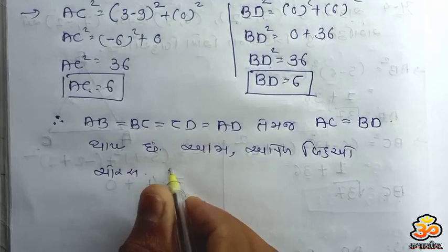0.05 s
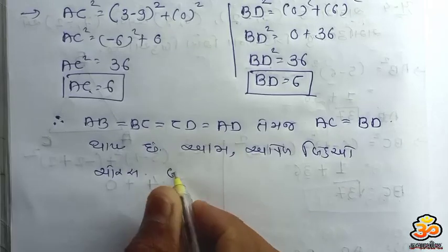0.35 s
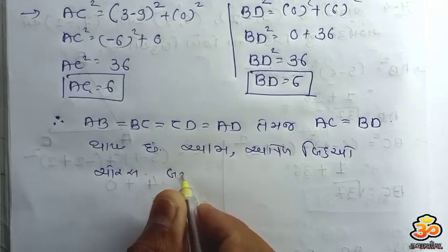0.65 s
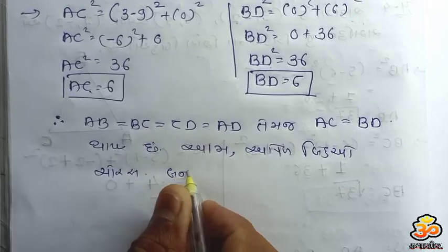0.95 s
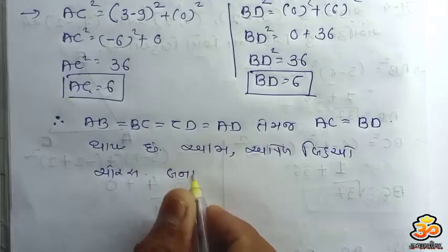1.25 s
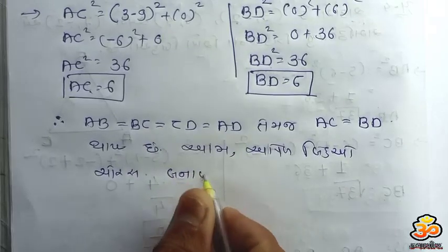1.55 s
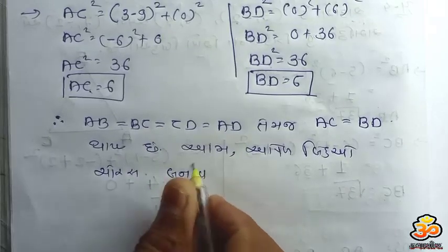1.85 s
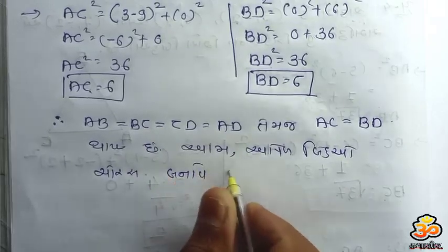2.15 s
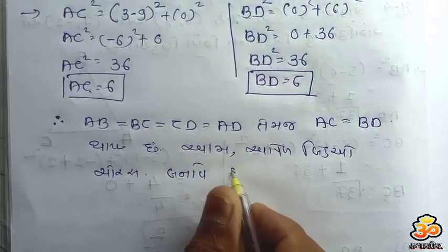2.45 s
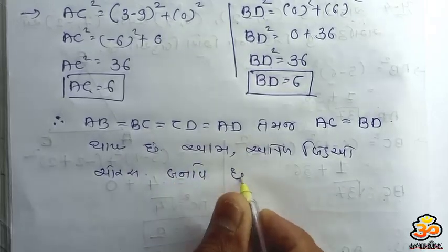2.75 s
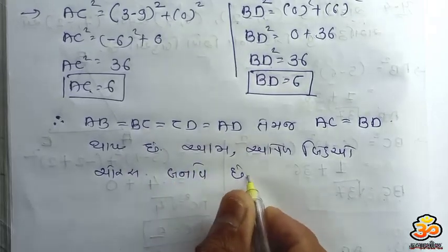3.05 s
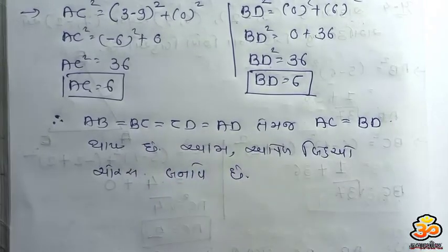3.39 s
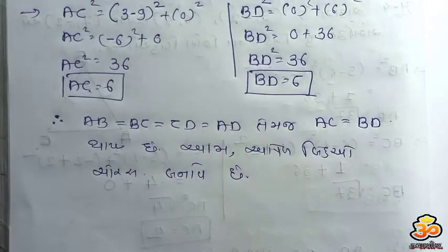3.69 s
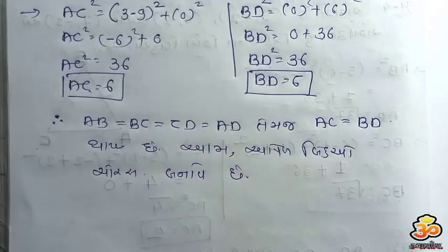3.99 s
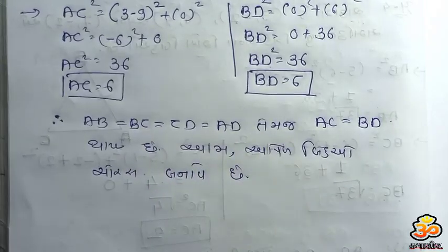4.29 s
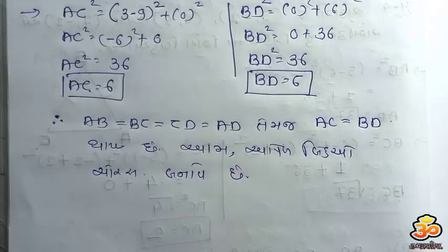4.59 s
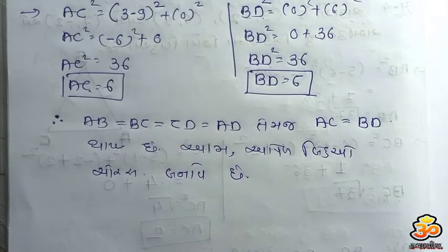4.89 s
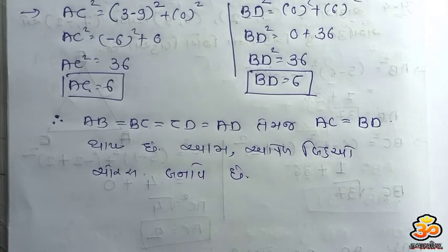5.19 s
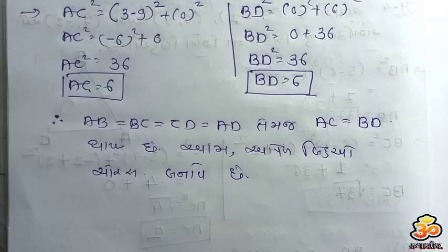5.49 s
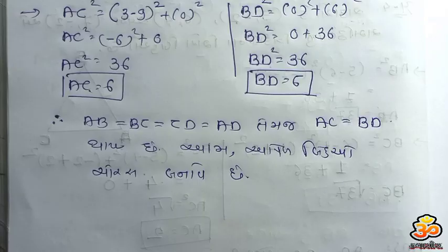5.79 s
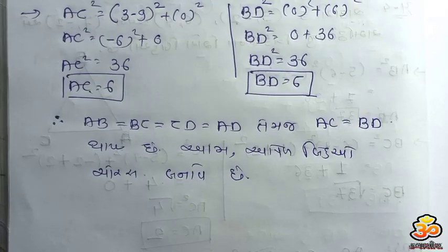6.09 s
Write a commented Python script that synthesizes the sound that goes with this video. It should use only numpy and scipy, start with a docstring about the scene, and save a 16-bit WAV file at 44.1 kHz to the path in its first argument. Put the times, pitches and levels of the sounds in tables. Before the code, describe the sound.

Crickets trill throughout in a quiet room, high and rapidly pulsing, with a fainter, lower cricket chirping slowly behind them. A ballpoint pen rolls faintly over paper near the microphone, clicking sharply a couple of times, and stops about halfway. It is put aside with a few light clicks and soft knocks on the desk. Then only the insects and a low room hum remain.

```python
"""Night in a quiet room. From the start two crickets scrape their wings, about ten strokes a second,
drifting out of step; a lower cricket chirps, an insect's wings buzz, a distant chorus hangs over the hum.
A ballpoint rolls and clicks across paper, finishing a word, and lifts just before three seconds.
It is put aside with a few clicks and soft knocks on the desk.
From about four and a half seconds on, only the insects and the room remain."""
import sys
import numpy as np
from scipy import signal
from scipy.fft import rfft, irfft, next_fast_len
from scipy.io import wavfile

SR = 44100
rng = np.random.default_rng(int(sys.argv[2]) if len(sys.argv) > 2 else 0)


def master_out(mix):
    """Clip the mix to full scale and print it as 16-bit PCM to the path in sys.argv[1]."""
    frames = np.transpose(np.atleast_2d(mix))
    ceiling = np.clip(frames, -1, 1)
    pcm = np.round(ceiling * 32767).astype(np.int16)
    wavfile.write(sys.argv[1], SR, pcm)


N = 270701


def near_cricket():
    """The lead voice: a bright trill with three early reflections off the walls."""
    # runs of even strokes, each a skip or change of pace: (start [s], pace [strokes/s], level [dB])
    runs = [(-0.031, 10.2, -38.7), (0.3504, 10.02, -38.8), (1.2487, 10.137, -38.7), (2.433, 10.137, -38),
            (3.7251, 9.951, -38.3), (4.4276, 10.17, -37.6)]
    # course of one stroke: (time [s], pitch [Hz], relative level [dB], pitch scatter [Hz])
    stroke = [(0, 8060, -19, 300), (.002, 7830, -12, 280), (.007, 7620, -9.5, 180), (.013, 7405, -6.5, 150),
              (.02, 7633, -6.5, 160), (0.026, 7500, -2, 70), (0.036, 7542, -1, 45.7),
              (.039, 7490, -12.5, 90.5), (0.043, 7030, -9, 120), (.048, 6820, -26.5, 200)]
    # first reflections: (delay [s], gain [dB])
    wall_echoes = [(0.0107, -7), (0.022, -18.5), (0.0338, -16.5)]
    direct = wing_scrape(wing_strokes(runs), stroke, wing_hz=7160, wing_width_hz=1060, scatter_rate=870,
                         flutter_hz=152, flutter_depth=0.31, octave_db=-43, rasp_db=-32.5, sheen_db=-50)
    echoed = direct.copy()
    for delay, db in wall_echoes:
        add(echoed, delay, from_db(db) * direct)
    return from_db(0.5) * reverb(echoed, t60=0.46, wet_db=-7.5)


def far_cricket():
    """A softer, slightly lower trill that arrives largely by way of the walls."""
    # runs of even strokes: (start [s], pace [strokes/s], level [dB])
    runs = [(0.0532, 10.02, -52), (0.6519, 10.4, -52.5), (1.4614, 10.34, -53), (2.139, 10, -52.5),
            (4.4505, 9.906, -51.5), (5.46, 9.735, -52)]
    # course of one stroke: (time [s], pitch [Hz], relative level [dB], pitch scatter [Hz])
    stroke = [(-.014, 7100, -14, 302), (0, 6950, -3.5, 290), (0.01, 6720, -1.5, 190),
              (.019, 6440, -2.5, 140), (0.023, 6330, -1.5, 85), (.030, 6100, -17, 80)]
    direct = wing_scrape(wing_strokes(runs), stroke, wing_hz=6670, wing_width_hz=2000, scatter_rate=720,
                         flutter_hz=213, flutter_depth=0.47, octave_db=-36, rasp_db=-36.5, sheen_db=-30)
    return from_db(2.5) * reverb(direct, t60=0.4, wet_db=0.5)


def low_cricket():
    """Slow, almost pure two-pulse chirps from a narrowly tuned wing."""
    # chirps: (time [s], level [dB])
    chirps = [(.149, -58), (.47, -59), (.853, -58.5), (1.239, -57.5), (1.587, -58), (2.017, -57.5),
              (2.353, -58), (2.762, -56.5), (3.27, -57.5), (3.584, -58.5), (3.927, -56.5), (4.338, -56.5),
              (4.709, -57.5), (5.047, -56), (5.623, -55.5), (5.926, -56)]
    # course of one chirp: (time [s], pitch [Hz], relative level [dB], pitch scatter [Hz])
    chirp = [(-.025, 3760, -21, 25), (0, 3804, -18.5, 25), (.02, 3808, -6.5, 16), (0.049, 3817, -1, 10.7),
             (0.075, 3818, -6.5, 11), (.086, 3810, -24, 25), (.1, 3812, -21, 22), (.116, 3814, -7.5, 20),
             (.138, 3805, -19, 30)]
    direct = wing_scrape(chirps, chirp, wing_hz=3770, wing_width_hz=280, scatter_rate=160,
                         flutter_hz=45.22, flutter_depth=0.062, octave_db=-55, rasp_db=-51, sheen_db=-58)
    return from_db(-0.04) * reverb(direct, t60=0.37, wet_db=-14)


def wing_strokes(runs, jitter_s=.0005, spread_db=0.25):
    """Strokes keep the pace of their run until the next takes over; gives (time [s], level [dB])."""
    ends = [start - .5 / pace for start, pace, _ in runs[1:]] + [N / SR]
    even = np.array([(s, db) for (start, pace, db), end in zip(runs, ends)
                     for s in np.arange(start, end, 1 / pace)])
    return even + rng.standard_normal(even.shape) * [jitter_s, spread_db]


def wing_scrape(strokes, shape, wing_hz, wing_width_hz, scatter_rate, flutter_hz, flutter_depth,
                octave_db, rasp_db, sheen_db):
    """A scraper runs along the wing's file: the tone falls as it slows; uneven teeth scatter the pitch."""
    times, *columns = np.transpose(shape)
    t = np.arange(times[0], times[-1], 1 / SR)
    hz, level_db, scatter_hz = (np.interp(t, times, c) for c in columns)
    tone, edge, uneven = np.zeros(N), np.zeros(N), drift(scatter_rate)
    for s, db in strokes:
        start = rng.integers(N - len(t))
        phase = 2 * np.pi * np.cumsum(hz + scatter_hz * uneven[start:start + len(t)]) / SR
        flutter = 1 + flutter_depth * np.cos(2 * np.pi * flutter_hz * rng.normal(1, .04) * t)
        force = np.sqrt(2) * from_db(db + level_db) * flutter
        octave = from_db(octave_db) * np.sin(2 * phase)
        rasp = from_db(rasp_db) * noise_band(8560, 2800, size=len(t))
        sheen = from_db(sheen_db) * noise_band(14400, 1500, size=len(t))
        add(tone, s + times[0], force * np.sin(phase))
        add(edge, s + times[0], force * (octave + rasp + sheen))
    # the wing membrane favours its own note; the edge comes straight from the teeth
    return resonance(tone, wing_hz, wing_width_hz) + edge


def ballpoint(roll_db, lift_s, grain_db):
    """The ball rolls over paper fibres until the pen lifts; slides, clicks and knocks stand out."""
    # pen and hand sliding on paper: (midpoint [s], length [s], level [dB], centre [Hz], width [Hz])
    slides = [(.28, .12, -75, 10300, 5020), (1.36, 0.17, -75, 10350, 4930), (2.098, 0.18, -64, 10980, 7040),
              (2.12, 0.2, -66.5, 3610, 4200), (2.271, 0.045, -62, 9580, 2230),
              (2.68, 0.15, -81, 10720, 5000), (3.066, 0.16, -72, 9600, 3000),
              (3.21, 0.12, -72.5, 1402, 300), (3.384, 0.31, -77, 444, 590), (4.176, .22, -71.5, 5030, 1980),
              (4.23, 0.23, -78.5, 329, 599)]
    on_paper = np.clip((lift_s - np.arange(N) / SR) / 0.081, 0, 1)
    rub = from_db(roll_db + 1.6 * drift(4.6)) * on_paper * noise_band(11700, 3800)
    for s, length, db, hz, width in slides:
        size = int(length * SR)
        add(rub, s - length / 2, from_db(db) * np.hanning(size) * noise_band(hz, width, size=size))
    impacts = pen_clicks() + desk_knocks()
    grain = from_db(grain_db * drift(600))
    return reverb(rub * grain + impacts, t60=0.2, wet_db=-6.0)


def pen_clicks():
    """The small, hard barrel rings briefly and gives no bass."""
    # clicks: (time [s], level [dB])
    clicks = [(1.567, -66), (2.073, -53), (2.138, -41), (2.152, -45), (2.7, -62), (3.009, -62),
              (3.174, -53), (3.194, -64), (3.217, -54), (3.234, -53), (3.308, -50), (3.475, -57.5)]
    # ring of the barrel: (pitch [Hz], relative level [dB], t60 [s])
    barrel_modes = [(1460, -23, 0.091), (1533, -20, 0.13), (3230, -14, 0.026), (3838, -8, 0.02),
                    (5420, -2.5, 0.0085)]
    ring = struck(clicks, barrel_modes, crack_db=-2, crack_s=.002)
    return signal.sosfilt(signal.butter(2, 1300, "high", fs=SR, output="sos"), ring)


def desk_knocks():
    """A padded contact thumps the desk and leaves it little treble."""
    # knocks: (time [s], level [dB])
    knocks = [(1.283, -63), (1.409, -60.5), (3.307, -53), (3.393, -58.5), (3.439, -57), (3.567, -59),
              (3.77, -62), (4.171, -57), (4.219, -60), (4.273, -57.5)]
    # ring of the desk: (pitch [Hz], relative level [dB], t60 [s])
    desk_modes = [(109.3, -2.5, 0.23), (213.2, -6, 0.12), (331, -6, 0.071), (454, -3.5, 0.037),
                  (710, -1, 0.019), (1189, -14, .012), (1748, -7, 0.0064)]
    ring = struck(knocks, desk_modes, crack_db=2.5, crack_s=0.0044)
    return signal.sosfilt(signal.butter(2, 3000, fs=SR, output="sos"), ring)


def struck(hits, modes, crack_db, crack_s):
    """Each hit is a short crack and rings every mode with a strength and tuning of its own."""
    out, t = np.zeros(N), np.arange(SR // 4) / SR
    for s, db in hits:
        sound = from_db(crack_db) * rng.standard_normal(len(t)) * np.exp(-t / crack_s)
        for hz, mode_db, t60 in modes:
            strength_db, tuning = rng.normal(0, 2), rng.normal(1, .03)
            sound += from_db(mode_db + strength_db - 60 * t / t60) * np.sin(2 * np.pi * hz * tuning * t)
        add(out, s, from_db(db) * sound)
    return out


def buzzing_insect(beat_hz, waver, flicker_db):
    """Fast, even wing beats make a comb of tones; the way through the room scrambles their phases."""
    # overtones of the wing beat: (harmonic number, level [dB])
    overtones = [(46, -80.5), (47, -78), (48, -84), (49, -81.5), (50, -77), (51, -78.5), (52, -88.5),
                 (53, -90)]
    phase = 2 * np.pi * np.cumsum(beat_hz * (1 + waver * drift(2.4))) / SR
    buzz = np.zeros(N)
    for k, db in overtones:
        level = np.sqrt(2) * from_db(db + flicker_db * drift(5.9))
        buzz += level * np.sin(k * phase + rng.uniform(0, 2 * np.pi))
    return buzz


def distant_chorus(waver_db, trill_hz, trill_width_hz, trill_db):
    """Many distant insects merge into narrow, wavering bands above one blurred low trill."""
    # swells of the low trill: (time [s], relative level [dB])
    trill_swells = [(0.0, -77.4), (0.36, -71), (0.6, -77.5), (0.72, -73), (1.93, -75.3), (2.05, -70.5),
                    (2.53, -76), (2.77, -70.5), (3.37, -73.5), (3.73, -75), (3.97, -70.6), (4.09, -75.5),
                    (4.7, -69.5), (4.94, -76.0), (5.3, -72), (6.14, -71)]
    # bands of the chorus: (centre [Hz], width [Hz], level [dB])
    bands = [(3910, 220, -76), (4346, 350, -79), (6645, 830, -65), (8620, 200, -77), (9590, 990, -77),
             (11300, 400, -87)]
    trill = from_db(in_time(trill_swells) + trill_db) * noise_band(trill_hz, trill_width_hz)
    return trill + sum(from_db(db + waver_db * drift(3.0)) * noise_band(hz, width)
                       for hz, width, db in bands)


def room_bed(level_db, hum_db, side_db):
    """Swelling rumble, thin hiss and a wavering hum; a little of the rumble spreads to the sides."""
    # hum of the house: (pitch [Hz], relative level [dB])
    hum_lines = [(70.0, -69.5), (274.5, -77), (705.2, -88)]
    # swells of the low rumble: (time [s], relative level [dB])
    rumble_swells = [(0.0, -60.5), (0.36, -64.5), (0.6, -52.5), (0.84, -59.0), (1.44, -61), (1.57, -55),
                     (1.81, -66.5), (1.93, -57), (2.17, -62.5), (3.49, -58), (3.61, -66), (4.33, -56.5),
                     (4.57, -62.7), (4.94, -60), (5.18, -55), (5.42, -60.9), (6.14, -60.4)]
    hum = sum(from_db(db) * noise_band(hz, width_hz=13.6) for hz, db in hum_lines)
    air = from_db(level_db) * room_tone() + from_db(hum_db) * hum
    bass = signal.sosfiltfilt(signal.butter(2, 150, fs=SR, output="sos"), air)
    rumble_db = in_time(rumble_swells)
    surge = from_db(rumble_db - rumble_db.mean())
    side = signal.sosfilt(signal.butter(2, 600, fs=SR, output="sos"), room_tone())
    return air + (surge - 1) * bass + from_db(level_db + side_db) * side * [[1], [-1]]


def room_tone():
    """Noise in the colour of the room, heavy in the bass; rms 1."""
    # spectrum of the room: (frequency [Hz], relative level [dB])
    spectrum = [(28, -39), (45, -8), (72, 2.5), (105, -1), (140, -8.5), (200, -9.5), (420, -20),
                (700, -24.5), (1000, -28.5), (1600, -31), (1900, -32.5), (5200, -44.5), (8600, -32.5),
                (11000, -32.5), (15500, -32)]
    hz = np.arange(N // 2 + 1) * SR / N
    points_hz, points_db = np.transpose(spectrum)
    colour = from_db(np.interp(np.log(hz + 1), np.log(points_hz), points_db))
    return rms_one(irfft(rfft(rng.standard_normal(N)) * colour, N))


def reverb(x, t60, wet_db):
    """Direct sound and a dying wash of reflections; the overall level is kept."""
    t = np.arange(int(t60 * SR)) / SR
    walls = rng.standard_normal(len(t)) * from_db(-60 * t / t60) * (t > .003)
    wet = rms_one(signal.fftconvolve(x, walls)[:N])
    return np.std(x) * rms_one(rms_one(x) + from_db(wet_db) * wet)


def resonance(x, hz, width_hz):
    """Two-pole resonance with gain 1 at its peak."""
    r = np.exp(-np.pi * width_hz / SR)
    feedback = [1, -2 * r * np.cos(2 * np.pi * hz / SR), r * r]
    return signal.lfilter(np.array([1, 0, -1]) * (1 - r * r) / 2, feedback, x)


def noise_band(hz, width_hz, size=N):
    """Noise twice through a resonance; rms 1."""
    return rms_one(resonance(resonance(rng.standard_normal(size), hz, width_hz), hz, width_hz))


def drift(rate_hz):
    """Smooth random wander; rms 1."""
    length = next_fast_len(N, True)
    hz = np.arange(length // 2 + 1) * SR / length
    slow = irfft(rfft(rng.standard_normal(length)) / (1 + (hz / rate_hz) ** 2), length)
    return rms_one(slow)[:N]


def in_time(rows):
    """An envelope through (time [s], value) points, at every sample."""
    return np.interp(np.arange(N) / SR, *np.transpose(rows))


def add(out, s, sound):
    """Mix a sound in at s seconds."""
    at = round(s * SR) + np.arange(len(sound))
    inside = (at >= 0) & (at < N)
    out[at[inside]] += sound[inside]


def from_db(db):
    """Decibels to gain."""
    return 10 ** (np.asarray(db) / 20)


def rms_one(x):
    """Scale to rms 1."""
    return x / np.sqrt(np.mean(x ** 2) + 1e-20)


def scene():
    """Insects, pen and room, nearly mono; the two trills and the chorus lean slightly right."""
    chorus = distant_chorus(waver_db=1.0, trill_hz=2739, trill_width_hz=195, trill_db=-2.5)
    chorus = chorus * from_db([[-.2], [.2]])
    buzz = buzzing_insect(beat_hz=86.88, waver=0.00018, flicker_db=1.0)
    pen = ballpoint(roll_db=-76.5, lift_s=2.87, grain_db=3.5)
    trills = (near_cricket() + far_cricket()) * from_db([[-.48], [.48]])
    chirps = low_cricket()
    bed = room_bed(level_db=-63, hum_db=-1.0, side_db=-22.5)
    return trills + chirps + pen + buzz + chorus + bed


def record(dry):
    """A steep low-pass takes off the very top."""
    cutoff_hz = 15400
    return signal.sosfilt(signal.ellip(12, .1, 80, cutoff_hz, fs=SR, output="sos"), dry)


dry = scene()
out = record(dry)
master_out(out)
```